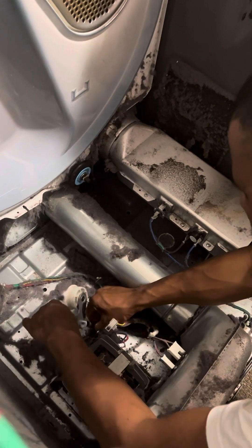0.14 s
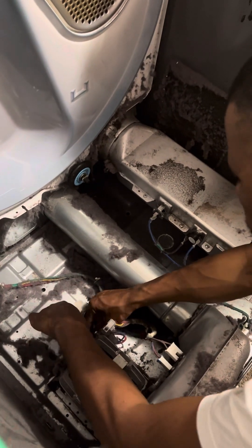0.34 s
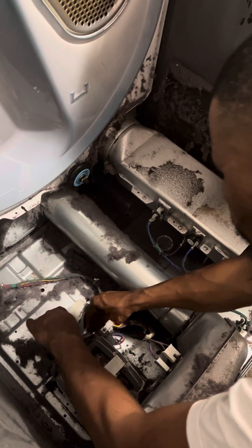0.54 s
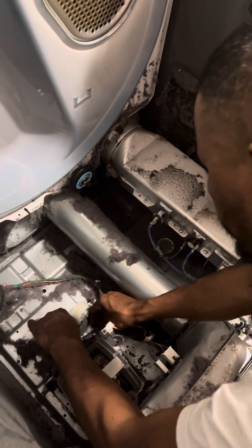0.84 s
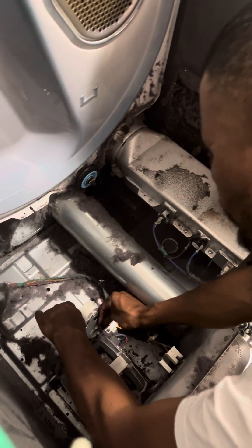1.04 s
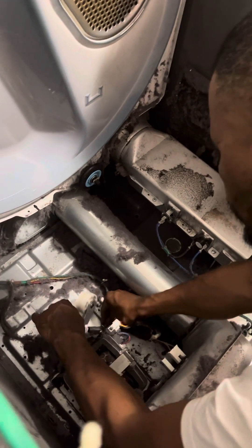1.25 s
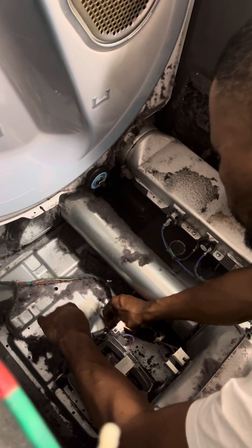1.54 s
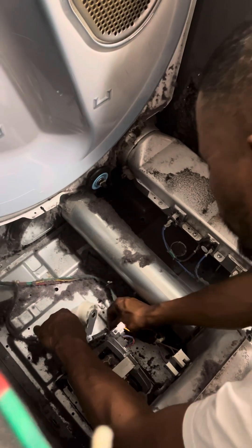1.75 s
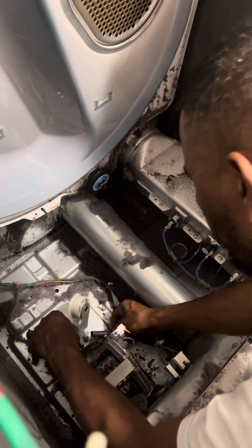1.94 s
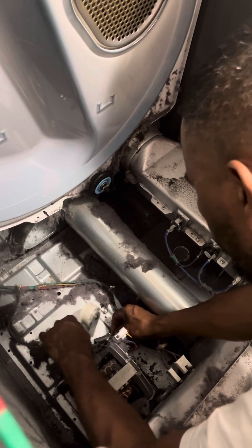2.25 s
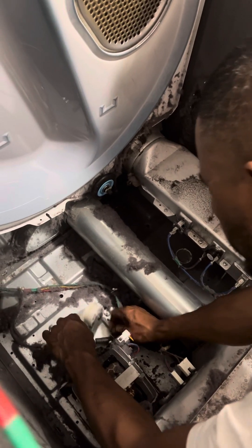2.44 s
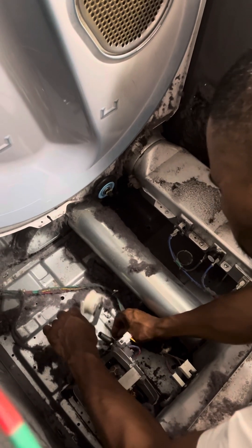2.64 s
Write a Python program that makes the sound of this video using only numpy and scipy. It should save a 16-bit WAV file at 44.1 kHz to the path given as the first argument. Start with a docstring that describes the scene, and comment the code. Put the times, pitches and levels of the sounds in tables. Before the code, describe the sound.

A loose part knocks in an open sheet-metal dryer cabinet. Faint sliding and quick ticks lead to a bright clack at 0.22 s and the loudest hollow clunk at 0.26. Softer knocks follow at 0.46, 0.6 and 0.75, firmer clunks at 1.13 and 1.62, another at 2.31, then sharp clicks at 2.44. Short boomy metal ring, gritty rubbing, faint wavering low hum throughout; close stereo.

```python
"""A loose part clunks against an open sheet-metal cabinet as it is worked by hand: each clunk is a short low crack,
a set of damped cabinet modes and a dense panel ring of shaped noise. Small steel fittings tick, as snap, ring and
wash; the part slides with a faint gritty noise. Patchy low noise and wavering lines hum throughout.
Two close microphone ports hear it all, differing in phase and level by frequency."""
import sys
import numpy as np
from scipy import signal
from scipy.fft import rfft, irfft, next_fast_len
from scipy.io import wavfile
from scipy.ndimage import uniform_filter1d, map_coordinates

SR = 44100
rng = np.random.default_rng(int(sys.argv[2]) if len(sys.argv) > 2 else 0)


def int16_out(signal):
    """Quantize to a 16-bit WAV file."""
    q = np.round(np.clip(np.atleast_2d(signal).T, -1, 1) * 32767)
    wavfile.write(sys.argv[1], SR, q.astype(np.int16))


N = 123479  # samples

# Modes of the steel fittings. Each row: frequency in Hz, relative level in dB, t60 in seconds.
STEEL_MODES = [(1809, -13, .06), (2050, -10, .05), (2250, -3, .1), (3316, -16, .03), (4800, -16, .025),
               (6900, -6, .022), (7450, 0, .03), (8930, 0, .028), (12000, 2, .035), (13300, -4, .014),
               (5800, -6, .03), (10400, -3, .03), (15500, -2, .02)]
STEEL_PEAK_DB, STEEL_Q = 4, 22


def amp(db):
    """dB to gain."""
    return 10 ** (np.asarray(db) / 20)


def unit(x):
    """Scale to rms 1."""
    return x / np.sqrt(np.mean(x ** 2) + 1e-20)


def along(f, v, hz):
    """Values v at f, read on a log frequency axis."""
    return np.interp(np.log(hz + 1), np.log(np.asarray(f) + 1), v)


def filtered(x, response):
    """x times a response of frequency."""
    m = next_fast_len(x.shape[-1] + 8192)
    spectrum = rfft(x, m) * response(np.fft.rfftfreq(m, 1 / SR))
    return irfft(spectrum, m)[..., :x.shape[-1]]


def add(track, start_s, sound):
    """Mix a sound into the track, cut at its end."""
    part = track[round(start_s * SR):][:len(sound)]
    part += sound[:len(part)]


def wobble(rate_hz):
    """Smooth random curve, rate_hz knots a second."""
    knots = rng.standard_normal(int(N * rate_hz / SR) + 4)
    return map_coordinates(knots, [np.arange(N) * rate_hz / SR])


def peaks(modes, hz, peak_db, q):
    """Resonant gain for noise: 1 plus a peak of peak_db at each mode."""
    centre = np.transpose(modes)[0][:, None]
    detune = 2 * q * (hz - centre) / centre
    return 1 + amp(peak_db) * np.max(1 / (1 + detune ** 2), axis=0)


def ring(modes, gain_db, t, hold_s):
    """Modes driven for hold_s, then damped; levels vary by blow and low modes take longer to speak."""
    beat_depth, beat_share = .5, .03  # share: spread of beat rate over mode frequency
    rise_cycles, spread_db = 2.2, 2.68
    hz, db, t60_s = np.transpose(modes)[:, :, None]
    beat_hz = beat_share * hz * rng.standard_normal(hz.shape)
    beat = 1 + beat_depth * np.sin(2 * np.pi * beat_hz * t)
    rise = 1 - np.exp(-t * hz / rise_cycles)
    level_db = db + gain_db(hz) + rng.normal(0, spread_db, hz.shape)
    decay_db = -60 * np.maximum(t - hold_s, 0) / t60_s
    return np.sum(amp(level_db + decay_db) * beat * rise * np.sin(2 * np.pi * hz * t), axis=0)


def hum():
    """Low room noise, patchy in time and frequency, with lines that waver in pitch and level."""
    # Noise spectrum. Each row: frequency in Hz, relative density in dB per Hz.
    spectrum_rows = [(20, -11), (45, -8), (72, -3), (120, -4), (180, -7), (300, -14.5), (600, -20.5),
                     (1200, -30), (2500, -37), (5000, -43.5), (9000, -57), (15500, -62)]
    # Hum lines. Each row: mean frequency in Hz, level in dB before line_gain_db.
    line_rows = [(72, -52.5), (119, -53.5), (179, -60.5)]
    noise_db, patchy_db, line_gain_db = -43, 2.5, 6.0
    waver_hz, waver_db = 5.03, 2.7  # scale of the random curves

    z = signal.stft(rng.standard_normal(N + 1024), nperseg=1024)[2]
    field = uniform_filter1d(rng.standard_normal(z.shape), size=5, axis=0)
    field = uniform_filter1d(field, size=5, axis=1)
    noise = signal.istft(z * amp(patchy_db * unit(field)), nperseg=1024)[1][:N]
    shaped = filtered(noise, lambda hz: amp(along(*np.transpose(spectrum_rows), hz)))
    out = amp(noise_db) * unit(shaped)
    for line_hz, db in line_rows:
        level = amp(db + line_gain_db + waver_db * wobble(9))
        phase = 2 * np.pi * np.cumsum(line_hz + waver_hz * wobble(15)) / SR
        out = out + level * np.sin(phase)
    return out


def rubs():
    """The part sliding: noise with a gritty random level, coloured by the steel, swelling and fading."""
    # Slides. Each row: start in seconds, length in seconds, level in dB.
    slide_rows = [(0.148, 0.14, -55), (0.528, 0.17, -62), (0.727, 0.19, -60.5), (0.946, 0.15, -58),
                  (1.108, 0.22, -53.5), (1.657, 0.23, -60.5), (2.087, 0.23, -85), (2.673, 0.091, -64)]
    # Noise spectrum. Each row: frequency in Hz, relative density in dB per Hz.
    spectrum_rows = [(300, -14), (2200, 9.5), (5000, -1.5), (15000, -12.5)]
    grit_db = 0.5

    def colour(hz):
        return amp(along(*np.transpose(spectrum_rows), hz)) * peaks(STEEL_MODES, hz, STEEL_PEAK_DB, STEEL_Q)

    t, level = np.arange(N) / SR, np.zeros(N)
    for start_s, length_s, db in slide_rows:
        progress = np.clip((t - start_s) / length_s, 0, 1)
        level = level + amp(db) * np.sin(np.pi * progress) ** .5
    grit = rng.standard_normal(N) * amp(grit_db * wobble(160))
    return level * unit(filtered(grit, colour))


def ticks():
    """A noise snap, the fitting's short modal ring and a fainter, longer wash off the cabinet walls."""
    # Ticks. Each row: start in seconds, level in dB, ring over snap in dB (before steel_db),
    # then one level in dB for each of bands_hz.
    tick_rows = [(0.156, -58.5, 7.5, 11.5, -10, -24, -29), (.190, -41, 7.5, -2, 0, -11, -19),
                 (.2042, -34, -9, -30, -4, -3, -24), (.214, -31, -11, -25, -9, -1, -20),
                 (0.2231, -19, 5.5, -27, -11.5, -4.5, -23), (.265, -24, -28, 6, -4.5, -14.5, -20),
                 (.2794, -40, -3, 0, -19, -27, -1), (.417, -46, 1, 11, 9, -8, -27),
                 (.431, -35, -13, -5, -5, -10.5, -19), (0.5921, -50.5, 5, 8, 10.5, -15, -16),
                 (1.022, -28, 9.5, -12, -13, -9, -16.5), (1.12, -43, 1, -3, -3, -12, -21),
                 (1.137, -39, -17, -3, -3, -1.5, -16), (1.235, -32, -1, 2, -9, -15, -19),
                 (1.409, -34, 8, -2.5, -6, -8.5, -14), (1.5634, -29.5, 3.5, -20, -6, -9, -22.5),
                 (1.5927, -45.5, 12, -13, -11, -1.5, -17), (1.6244, -41.5, -8, 17, -8, -14, -14),
                 (1.6379, -42, 8, -13, -4, 1, -24), (1.853, -40.5, -6, 3, 7.5, -23, -19),
                 (2.066, -53.5, 5.5, -8, -13, -2, -8), (2.1853, -43, 4.5, -5, -4.5, -16, -21.5),
                 (2.3255, -24.5, 6, -32, -6, -15, -9.5), (2.4371, -24, -1.5, -2.5, -6.5, -20.5, -14),
                 (2.4425, -27.5, -4, 0, 3.5, -13, -23), (2.553, -42.5, 3, -2, -8, -9, -13.5)]
    # Band centres in Hz.
    bands_hz = [2200, 4000, 8000, 12500]
    steel_db, rise_s = -10.5, 0.0012
    snap_db, snap_t60_s = 4, 0.018
    wash_db, wash_t60_s = -9.5, 0.18

    out, t = np.zeros(N), np.arange(SR // 4) / SR
    rise = (1 - np.exp(-t / rise_s)) ** 2
    snap_and_wash = amp(snap_db - 60 * t / snap_t60_s) + amp(wash_db - 60 * t / wash_t60_s)
    for start_s, db, ring_db, *bands_db in tick_rows:
        def tint_db(hz):
            return along(bands_hz, bands_db, hz)

        def colour(hz):
            low_cut = 1 / (1 + (1200 / (hz + 1)) ** 4)
            return amp(tint_db(hz)) * peaks(STEEL_MODES, hz, STEEL_PEAK_DB, STEEL_Q) * low_cut

        hiss = filtered(rng.standard_normal(len(t)), colour) * snap_and_wash
        steel = amp(steel_db + ring_db) * ring(STEEL_MODES, tint_db, t, 2 * rise_s)
        add(out, start_s, amp(db) * (steel + hiss) * rise)
    return out


def clunks():
    """A decaying low crack, plus cabinet modes and dense panel noise driven for the chatter, then damped."""
    # Clunks. Each row: start in seconds, level in dB, chatter in seconds, brightness in dB per octave,
    # modes gain in dB.
    clunk_rows = [(.190, -35.5, 0.051, 0, -6.5), (.262, -20.5, 0.023, 1, 1.5), (0.461, -40, 0.033, -3.5, 1),
                  (0.586, -37, 0.012, -5.5, -2), (.743, -41.5, 0.027, -6.5, 8),
                  (1.025, -42.5, 0.0094, -0.5, -1), (1.131, -28, 0.024, 0.5, 4), (1.223, -39, 0.003, 0, -3),
                  (1.40, -43, 0.014, 0.5, 0.5), (1.621, -29, 0.022, 0, 2.5), (1.853, -46, 0.021, 2, 1.5),
                  (2.314, -26.5, 0.024, 0, 2.5), (2.437, -39.5, 0.022, 2, 3)]
    # Cabinet modes. Each row: frequency in Hz, relative level in dB, t60 in seconds.
    cabinet_modes = [(70, -22, 0.4), (176, -11, .3), (261, 1, 0.09), (279, -17, 0.45), (328.5, -16, .25),
                     (497, -17, 0.25), (582, -17, 0.07), (670, -12, 0.2), (775, -18, 0.14),
                     (900, -19, 0.15), (1090, -14, 0.1), (1493, -24, .1), (1925, -22, 0.09),
                     (2223, -26, 0.06)]
    # Dense panel ring. Each row: frequency in Hz, relative level in dB, t60 in seconds, build-up in seconds.
    panel_rows = [(39.7, -12, 0.26, 0.02), (82, 9.5, 1, 0.055), (194, 4, 1, 0.13),
                  (309, -3.5, 0.94, 0.0013), (687, -9.5, 0.58, 0.005), (1770, -18, 0.34, 0.0048),
                  (3150, -24.5, 0.32, 0.013), (7200, -36.5, 0.24, 0.002), (14300, -58, 0.46, 0.0031)]
    length = SR * 7 // 10  # samples
    crack_db, crack_hz, crack_t60_s = 5.5, 624, 0.019
    panels_db, peak_db, q, build_s = 13, 5, 25, 0.0004

    out, t = np.zeros(N), np.arange(length) / SR
    f, level_db, t60_s, panel_build_s = np.transpose(panel_rows)
    build = 1 - np.exp(-t / build_s)
    crack = amp(crack_db - 60 * t / crack_t60_s) * build * np.sin(2 * np.pi * crack_hz * t)
    for start_s, db, chatter_s, bright_db, modes_db in clunk_rows:
        def tilt_db(hz):
            return bright_db * np.log2((hz + 30) / 300)

        def colour(hz):
            return amp(along(f, level_db, hz) + tilt_db(hz)) * peaks(cabinet_modes, hz, peak_db, q)

        hz, frame_s, z = signal.stft(rng.standard_normal(length), SR, nperseg=256)
        decay = amp(-60 * np.maximum(frame_s - chatter_s, 0) / along(f, t60_s, hz)[:, None])
        swell = 1 - np.exp(-(frame_s + 0.009) / along(f, panel_build_s, hz)[:, None])
        noise = signal.istft(z * decay * swell, SR, nperseg=256)[1][:length]
        panels = amp(panels_db) * filtered(noise, colour) * build
        modes = amp(modes_db) * ring(cabinet_modes, tilt_db, t, chatter_s)
        add(out, start_s, amp(db) * (crack + modes + panels))
    return out


def scene():
    """Direct sound, and an equally strong copy in random phase as scattered by nearby surfaces."""
    direct = hum() + rubs() + ticks() + clunks()
    z = signal.stft(direct, nperseg=256)[2]
    random_phase = np.exp(2j * np.pi * rng.random(z.shape))
    scattered = signal.istft(z * random_phase, nperseg=256)[1][:N]
    return np.array([direct, unit(scattered) * np.std(direct)])


def record(dry):
    """Ports mix direct and scattered sound with opposite signs, phases and levels, under a band limit."""
    # Phase between ports. Each row: frequency in Hz, left lead in radians.
    lead_rows = [(0, 0), (250, -.4), (800, -1), (1600, 0), (2800, 2.3), (4200, 1.2), (5000, 1.4),
                 (5900, 3.14), (8200, 6.28), (10200, 9.42), (11800, 12.3), (13100, 12.8), (14100, 15.5),
                 (15300, 15.9), (16000, 16.5)]
    # Port likeness. Each row: frequency in Hz, likeness where 1 is identical.
    alike_rows = [(60, 1), (300, 1), (900, 0.48), (1900, 0.87), (3000, 0.21), (4500, 0.42), (5800, 0.99),
                  (16000, .995)]
    # Level between ports. Each row: frequency in Hz, left over right in dB.
    left_rows = [(60, -.3), (900, -2.6), (2200, -.9), (4500, -1.5), (6000, 0)]
    # Microphone response. Each row: frequency in Hz, gain in dB.
    mic_rows = [(20, -9), (35, 0), (13600, 0), (14400, -8), (16000, -2)]
    top_hz = 15900

    def port(side):
        def response(hz):
            turn = np.arccos(np.clip(along(*np.transpose(alike_rows), hz), -1, 1)) / 2
            level = amp(side * along(*np.transpose(left_rows), hz) / 2)
            phase = np.exp(.5j * side * np.interp(hz, *np.transpose(lead_rows)))
            mic = amp(along(*np.transpose(mic_rows), hz)) * (hz < top_hz)
            return level * phase * mic * np.array([np.cos(turn), side * np.sin(turn)])
        return filtered(dry, response).sum(axis=0)

    return np.array([port(1), port(-0.99)])  # left, right


dry = scene()
out = record(dry)
int16_out(out)
```